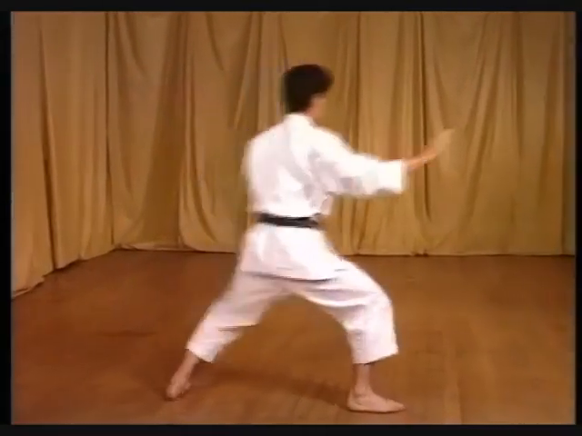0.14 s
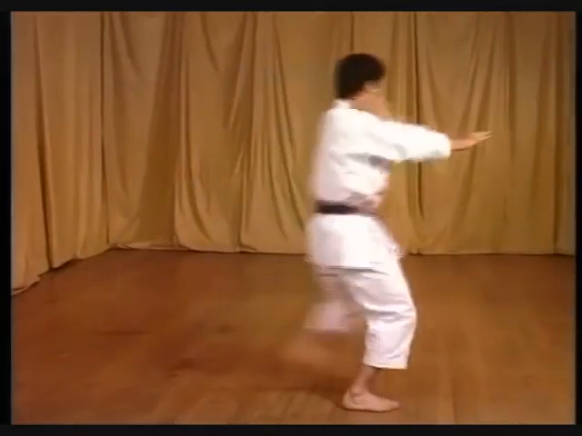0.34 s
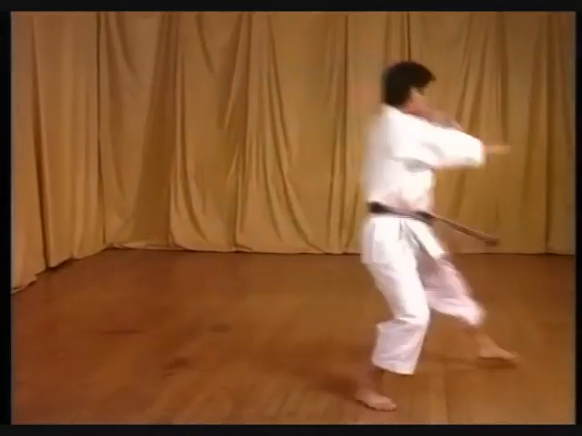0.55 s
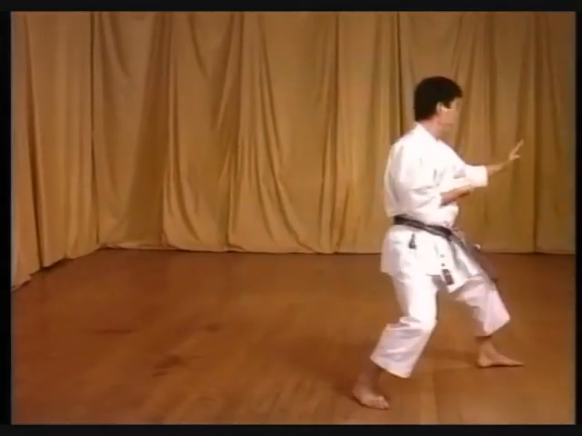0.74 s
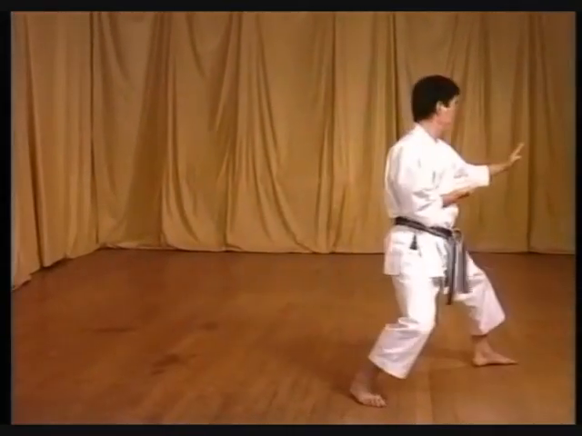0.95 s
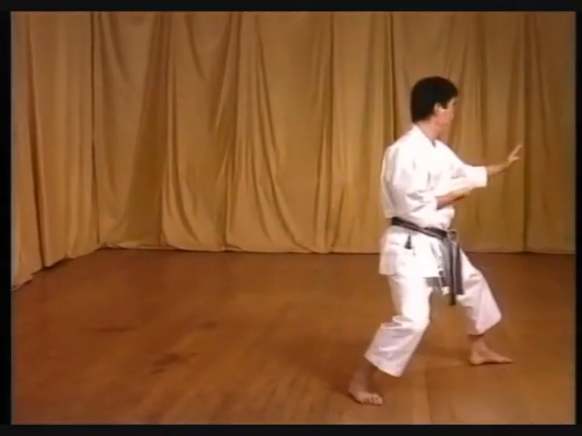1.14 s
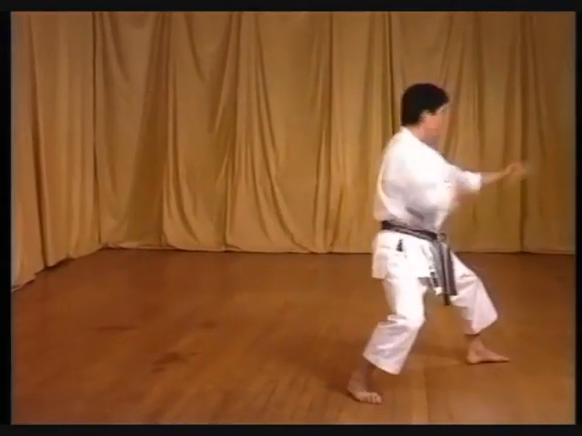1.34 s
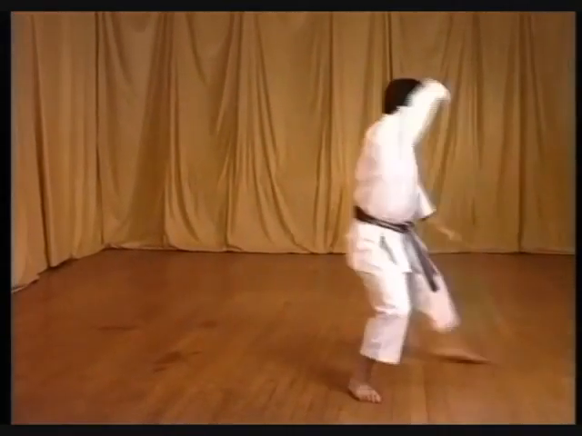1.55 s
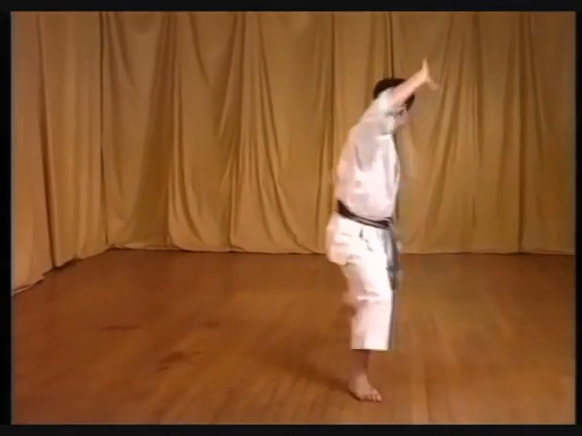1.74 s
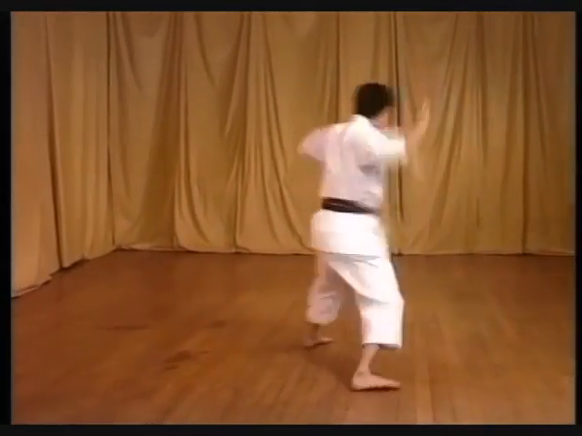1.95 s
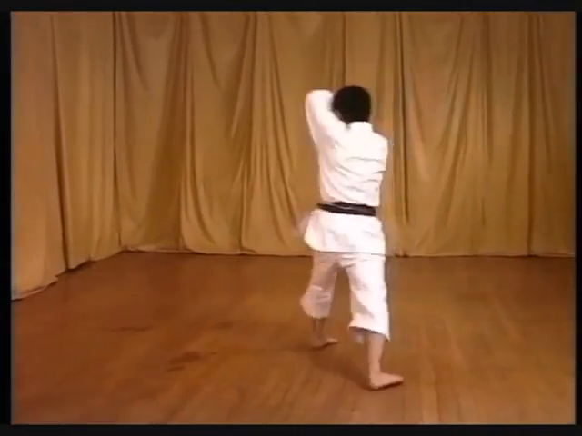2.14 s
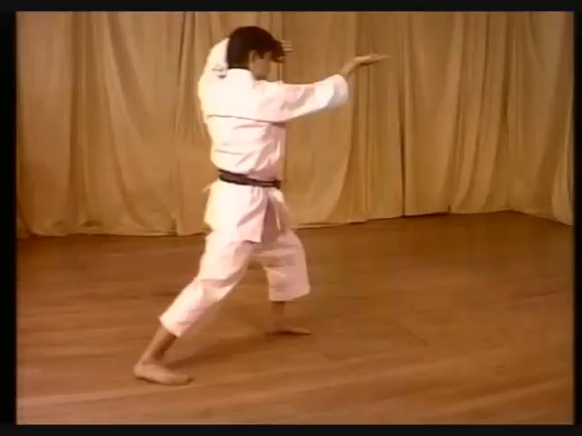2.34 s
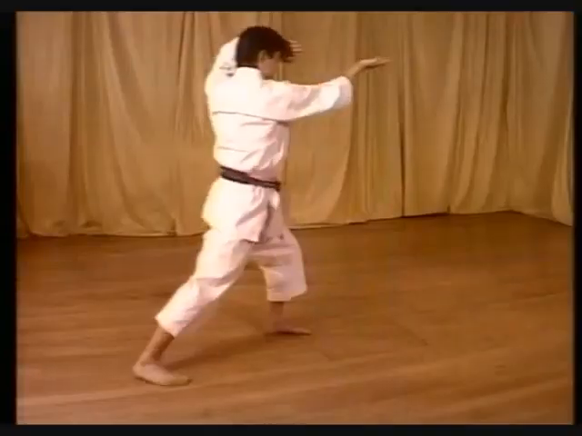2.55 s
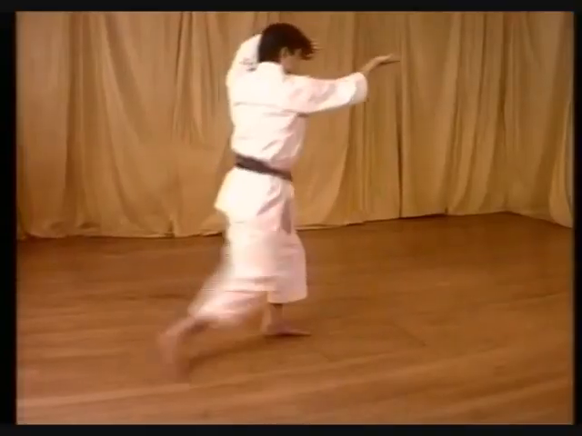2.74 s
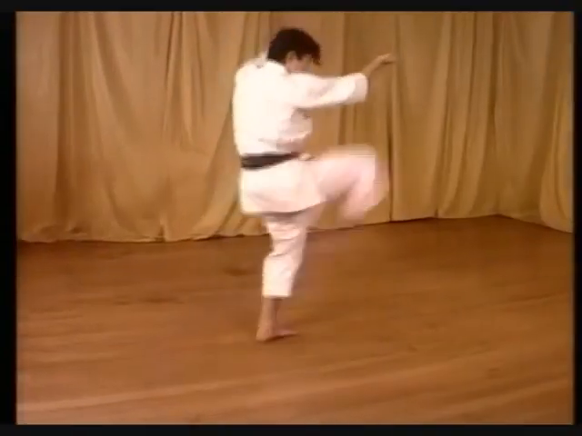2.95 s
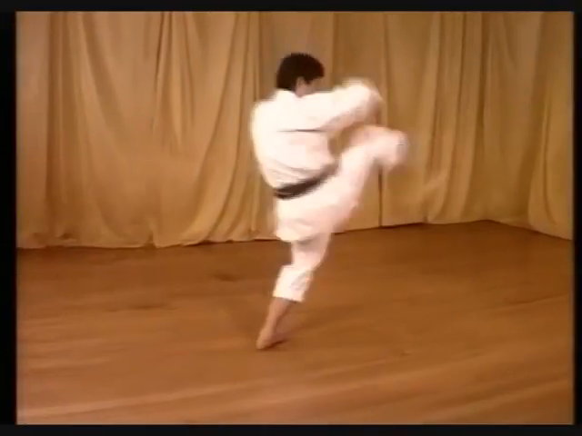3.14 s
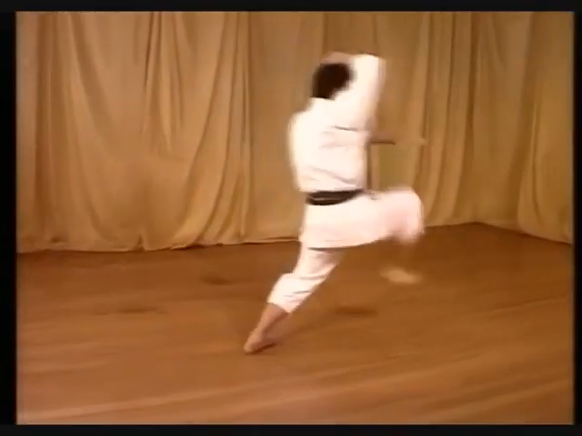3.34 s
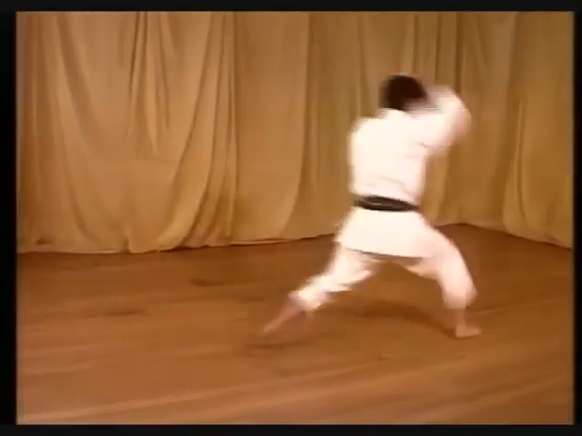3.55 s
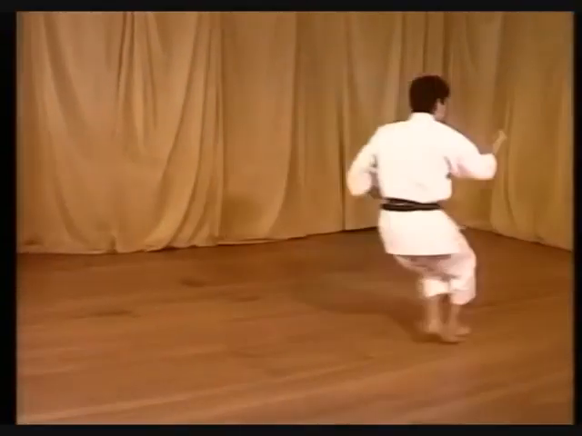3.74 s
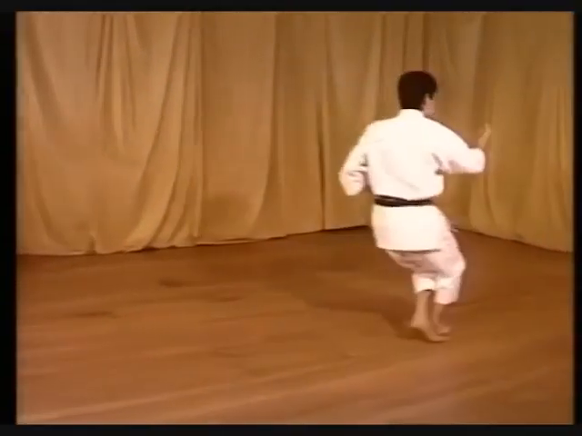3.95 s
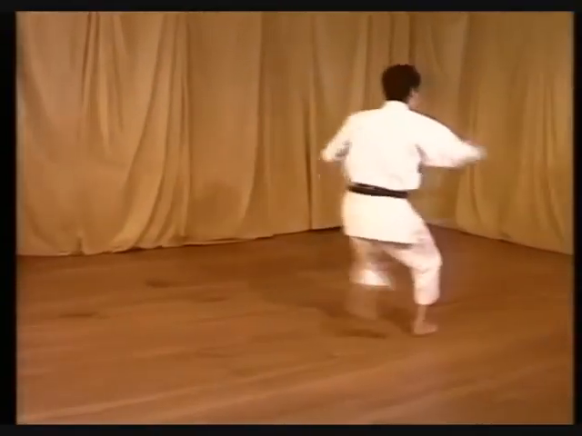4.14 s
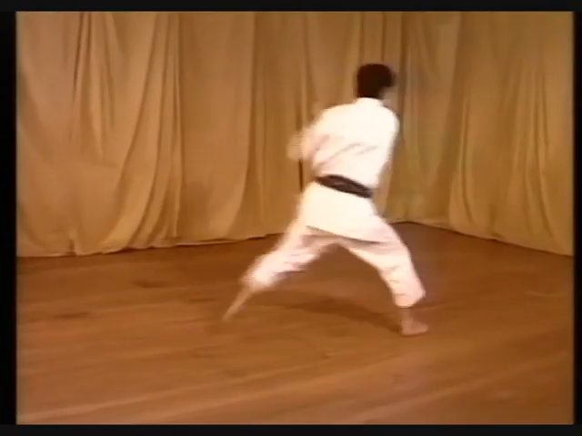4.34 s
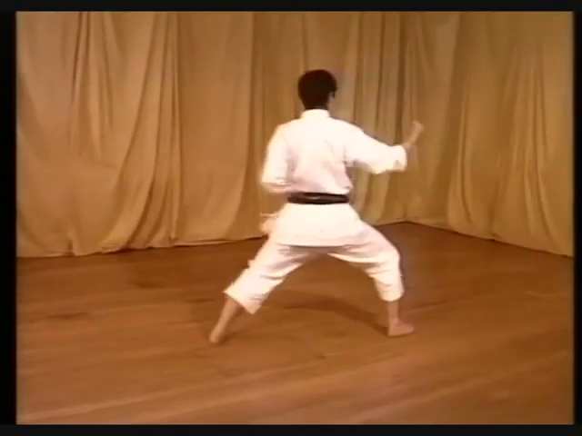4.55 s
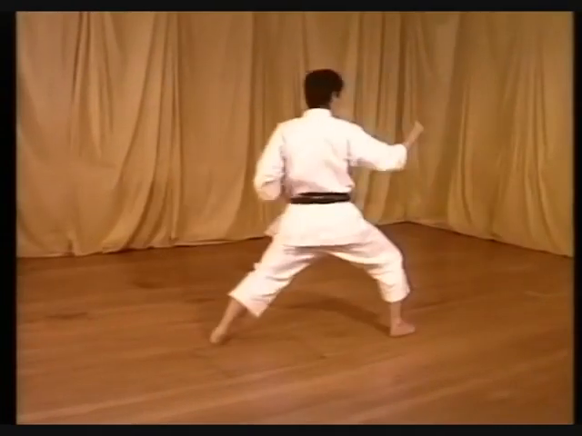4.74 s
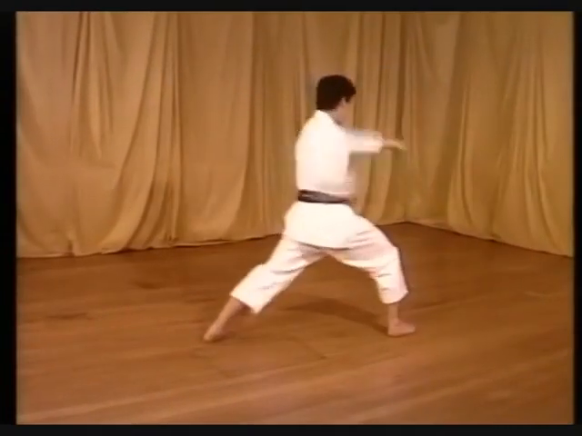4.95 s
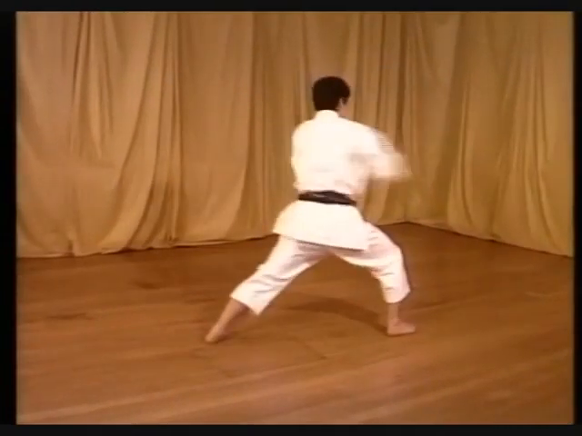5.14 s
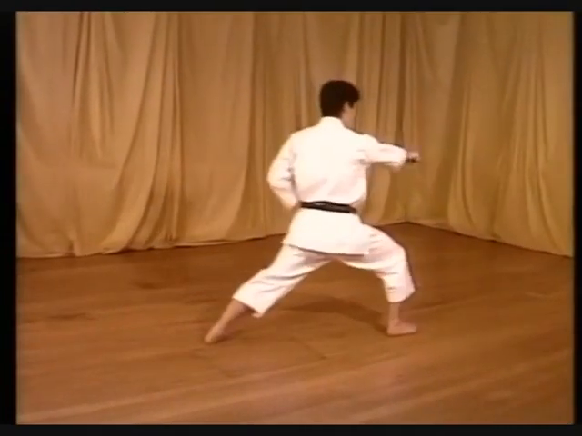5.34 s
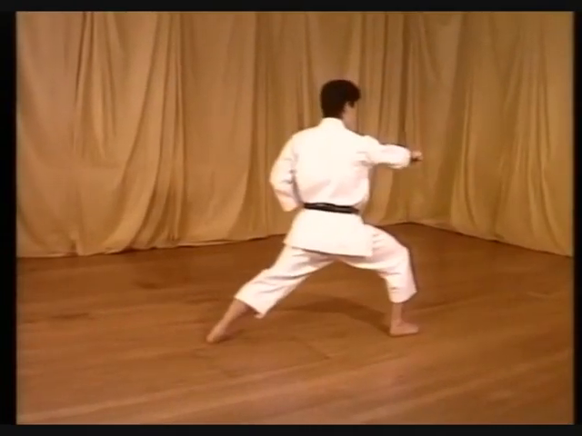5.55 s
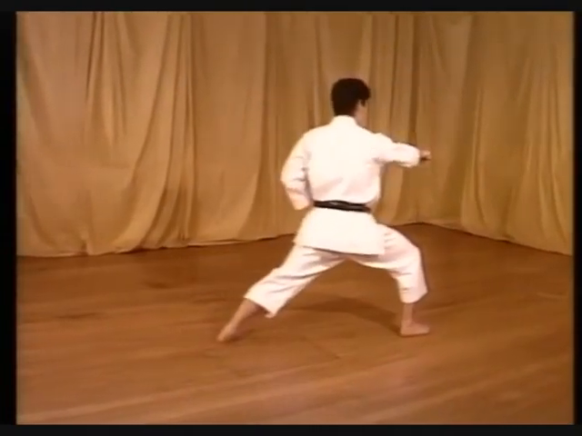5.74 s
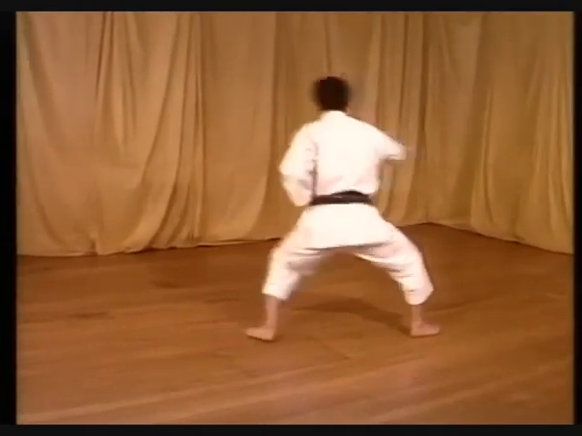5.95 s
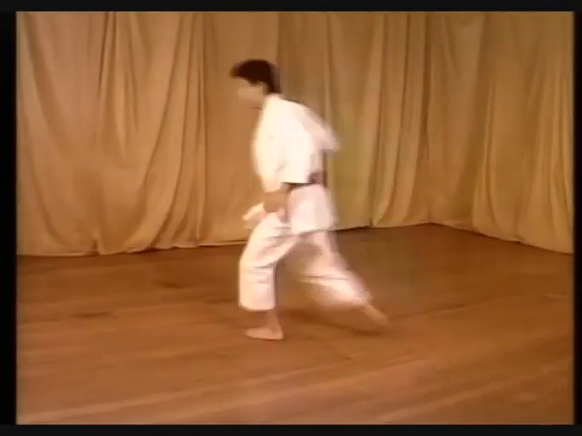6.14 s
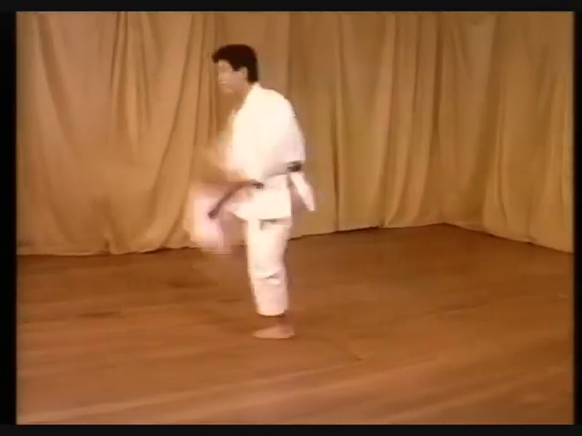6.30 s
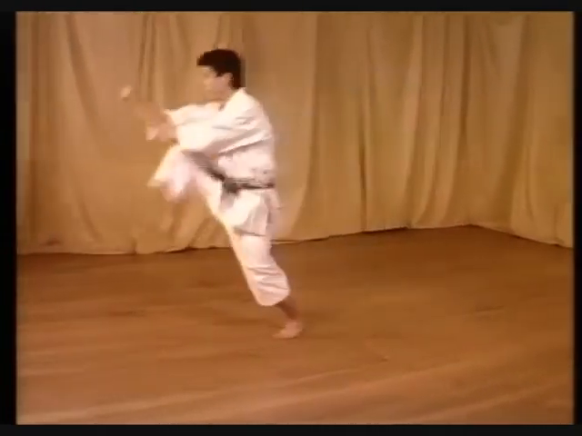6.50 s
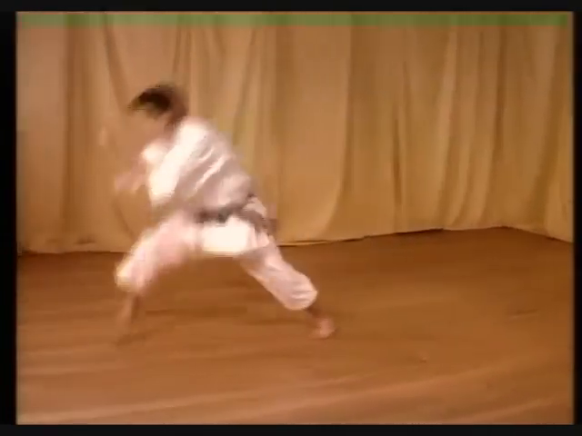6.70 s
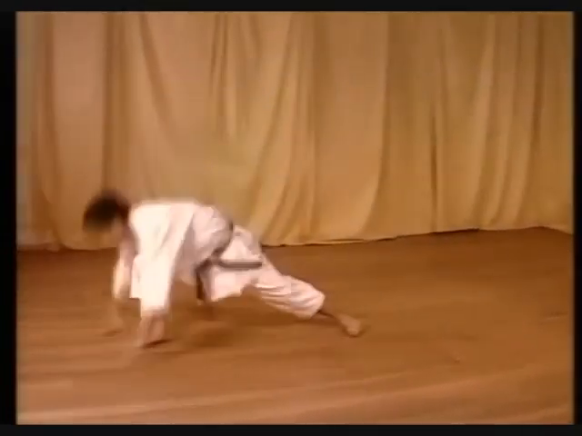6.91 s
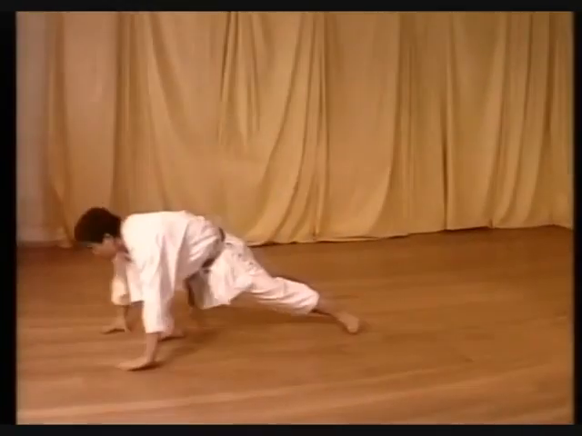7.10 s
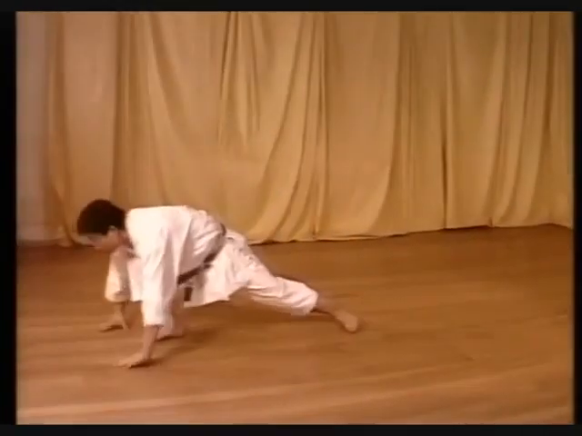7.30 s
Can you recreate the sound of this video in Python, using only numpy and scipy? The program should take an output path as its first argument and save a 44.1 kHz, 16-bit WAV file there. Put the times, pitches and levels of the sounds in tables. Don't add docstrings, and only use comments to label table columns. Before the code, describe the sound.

Low tape hiss and hum underlie bursts of thick cloth movement in an indoor hall. Early swishes and a crisp snap give way to a pause, turning rustles and soft foot squeaks. A jump lands with a huge, slightly squashed wooden thud, followed by a squeak, stamps and tight cloth pops. Near the end a sharp crack of cloth precedes a deep lunge thud and softer hand pats, all with short room reverberation.

```python
import sys
import numpy as np
from scipy import signal
from scipy.fft import rfft, irfft
from scipy.io import wavfile
from scipy.ndimage import uniform_filter1d

SR = 44100
rng = np.random.default_rng(int(sys.argv[2]) if len(sys.argv) > 2 else 0)


def decibels_to_gain(level_db):
    exponent = np.asarray(level_db, float) / 20
    return 10 ** exponent


def dump(signal):
    limited = np.clip(np.atleast_2d(signal).T, -1, 1)
    pcm = np.round(limited * 32767).astype(np.int16)
    wavfile.write(sys.argv[1], SR, pcm)


N = 329413


def unit(x):
    return x / np.sqrt(np.mean(x ** 2))


def band(x, low_hz, high_hz, order=2):
    edges_hz = [low_hz, min(high_hz, 0.48 * SR)]
    return signal.sosfilt(signal.butter(order, edges_hz, "band", fs=SR, output="sos"), x)


def walk(rate_hz):
    hold = int(SR / rate_hz)
    levels = rng.standard_normal(N // hold + 1)
    return uniform_filter1d(np.repeat(levels, hold), hold)[:N]


def bursts(starts_s, levels_db, lengths_ms, rise_ms):
    out = np.zeros(N + SR)
    t_ms = np.arange(SR // 4) / SR * 1000
    rise = np.minimum(t_ms / rise_ms, 1)
    for start_s, level_db, length_ms in zip(starts_s, levels_db, lengths_ms):
        i = int(start_s * SR)
        out[i:i + len(t_ms)] += decibels_to_gain(level_db) * rise * np.exp(-t_ms / max(length_ms, 0.3))
    return out[:N]


# frequency_hz [Hz], density_db [dB per Hz]
HISS_SPECTRUM = [(15, -38), (25, -2.5), (76, -7.5), (127, -6.5), (195, -19.5), (427, -10.5), (2410, -31),
                 (16000, -31)]
# [dB rms after, before the splice]
WHISTLES = [(100, -66, -74), (150, -72, -70), (9603, -78.5, -95), (15626, -80.5, -80.5)]
# time_s [s], level_db [dB rms]
MAINS_HUM = [(0.0, -58.5), (1.3, -72), (2.4, -66), (4.0, -58.5), (7.47, -54.5)]
HISS_DB, SPLICE_S = -58, 2.4


def machine_noise():
    hz, density_db = np.transpose(HISS_SPECTRUM)
    bin_hz = np.arange(N // 2 + 1) * SR / N + 1
    shape = decibels_to_gain(np.interp(np.log(bin_hz), np.log(hz), density_db))
    hiss = irfft(rfft(rng.standard_normal(N)) * shape, N)
    t = np.arange(N) / SR
    tape_time = t + np.cumsum(0.0004 * (walk(6) - walk(6))) / SR
    tones = np.zeros(N)
    for hz, late_db, early_db in WHISTLES:
        level_db = np.where(t > SPLICE_S, late_db, early_db) + 1.1 * walk(4.64)
        tones += decibels_to_gain(level_db) * np.sin(2 * np.pi * hz * tape_time)
    hum_db = np.interp(t, *np.transpose(MAINS_HUM)) + 1.7 * walk(6.8)
    tones += decibels_to_gain(hum_db) * np.sin(2 * np.pi * 50 * tape_time)
    return decibels_to_gain(HISS_DB + 0.12 * walk(1.8)) * unit(hiss) + np.sqrt(2) * tones


# centre_hz [Hz], t60_s [s], build_up_ms [ms], level_db [dB]
HALL_BANDS = [(59, 0.56, 150, 2), (124.5, 0.5, 4.4, -0.5), (225, 0.61, 2.5, -3.5), (431, 0.62, 1.4, -3),
              (1086, 0.55, 1.2, -7.5), (1820, 0.5, 0.46, -3.5), (3630, 0.42, 0.57, -7.5),
              (7850, 0.68, 7, -8.5), (13000, 0.48, 3, -13)]


def echoes(count):
    t = np.arange(int(1.3 * SR)) / SR
    echo = 0
    for hz, t60_s, build_up_ms, level_db in HALL_BANDS:
        noise = band(rng.standard_normal((count, len(t))), hz / np.sqrt(2), hz * np.sqrt(2))
        envelope = (1 - np.exp(-t * 1000 / build_up_ms)) * 1000.0 ** (-t / t60_s)
        echo = echo + decibels_to_gain(level_db) * noise * envelope
    return np.pad(echo, ((0, 0), (int(0.006 * SR), 0)))


def hall(x, echo):
    size = SR // 2
    out, padded = np.zeros(N + 4 * SR), np.pad(x, size)
    for k, i in enumerate(range(-size // 2, N, size // 2)):
        part = padded[i + size:i + 2 * size] * np.hanning(size)
        wet = signal.fftconvolve(part, echo[k % len(echo)])
        out[i + size:i + size + len(wet)] += wet
    return out[size:size + N]


# start_s [s], level_db [dB], pitch_hz [slips per s], length_s [s], overtone_db [dB]
SKIN_SQUEAKS = [
    (0.262, -14, 408, 0.023, -18.5),
    (1.946, -21.5, 402, 0.02, -40),
    (2.167, -25.5, 430, 0.045, -36),
    (2.265, -35.5, 520, 0.039, -43),
    (2.775, -33.5, 517, 0.037, -8.5),
    (2.799, -28.5, 576, 0.032, -26),
    (2.82, -32.5, 733, 0.027, -18),
    (4.088, -13.5, 318.6, 0.038, -13),
    (4.092, -21, 578, 0.045, -45),
]


def squeaks():
    out = np.zeros(N)
    waver = 1 + 0.015 * walk(150)
    for start_s, level_db, pitch_hz, length_s, overtone_db in SKIN_SQUEAKS:
        progress = np.arange(int(length_s * SR)) / (length_s * SR)
        i = int(start_s * SR)
        span = slice(i, i + len(progress))
        phase = 2 * np.pi * np.cumsum(pitch_hz * waver[span]) / SR
        tone = np.sin(phase) + decibels_to_gain(overtone_db) * np.sin(2 * phase)
        out[span] += decibels_to_gain(level_db) * np.sin(np.pi * progress) ** 2 * tone
    return out


def resonate(x, modes):
    out = 0
    for k, (hz, width_hz, level_db) in enumerate(modes):
        mode = signal.lfilter(*signal.iirpeak(hz, hz / width_hz, SR), x)
        out = out + (-1) ** k * decibels_to_gain(level_db) * mode
    return out


# start_s [s], blow_db [dB], boom_db, knock_db, slap_db [dB re blow]
FLOOR_BLOWS = [(0.666, -27, 14.5, -11, -20), (0.71, -24.5, -6, -1.5, 0), (1.951, -22, -9, -11.5, -33),
               (2.041, -38, -2, 14.5, 5), (3.645, 1.5, -4.5, -3.5, -11), (4.343, -29.5, -17, 9.5, 1),
               (4.537, -12, 1.5, 6.5, -24), (5.316, -14, -18, 6.5, -8), (6.172, -21, -1.5, -7, -13),
               (6.192, -31.5, -25, 7, -10), (6.846, -7.5, 9, -13, -11), (7.015, -20, 0.5, 7, -33),
               (7.04, -21, -23, -14, -29)]
# frequency_hz [Hz], width_hz [Hz], level_db [dB]
BOARD_MODES = [(139, 11, -33), (221.4, 115, -7), (269, 43, 3), (382.4, 99.4, 6.5), (430, 176, 3.5)]
# frequency_hz [Hz], width_hz [Hz], level_db [dB]
KNOCK_MODES = [(520, 227, 3.5), (641, 320, 6), (820, 180, -5.5), (946, 225, -4.5)]
SLAP_BAND = 1000, 2600
SCUFF_DB = -21.5
SCUFF_PER_DB, SCUFF_PER_BOOM = 0.8, 0.5


def stamps():
    start_s, blow_db, boom_db, knock_db, slap_db = np.transpose(FLOOR_BLOWS)
    count = len(start_s)
    lags_s = np.cumsum(rng.uniform(0.001444, 0.0046, (count, 3)), axis=1) - 0.0015

    def contacts(level_db):
        out = np.zeros(N)
        out[(start_s * SR).astype(int)] = decibels_to_gain(level_db)
        later = ((start_s[:, None] + lags_s) * SR).astype(int)
        out[later] = decibels_to_gain(level_db[:, None] - np.array([6, 9, 12]))
        return out

    blow = resonate(contacts(blow_db + 39), BOARD_MODES)
    blow += resonate(contacts(blow_db + knock_db + 32.5), KNOCK_MODES)
    blow = band(band(blow, 60, 1600), 30, 1800)
    boom = band(band(contacts(blow_db + boom_db + 42), 42, 144, order=1), 69, 206)
    slap = band(band(contacts(blow_db + slap_db + 18.5), *SLAP_BAND), 500, 4100)
    scuff_db = SCUFF_DB + SCUFF_PER_DB * blow_db + SCUFF_PER_BOOM * boom_db
    scuff_env = bursts(start_s, blow_db + scuff_db - 1.5, np.full(count, 9.0), rise_ms=1)
    scuff = band(rng.standard_normal(N) * scuff_env, 1530, 10400, order=1)
    return blow + slap + scuff, boom


# start_s [s], body_db [dB], length_ms [ms]
FOLD_POPS = [(0.211, -42, 5), (0.584, -32, 6.3), (2.125, -21, 3.8), (2.151, -23, 5.6), (2.341, -28, 3),
             (2.459, -37.5, 8), (2.779, -28, 3.4), (2.934, -29.5, 7.2), (3.07, -16, 1.86),
             (3.127, -23.5, 14), (3.165, -18, 12), (3.204, -40, 2.2), (4.445, -24, 5), (4.996, -21, 4.4),
             (5.058, -17, 9.8), (5.084, -9, 3.8), (5.284, -26, 11), (5.766, -35.5, 6), (6.328, -16.5, 4.8),
             (6.414, -17.5, 4), (6.485, -4, 1.06), (7.118, -26, 3.5), (7.232, -29, 4.2)]
# start_s [s], body_db [dB], slap_db,
# crack_db [dB re body], length_ms [ms]
BRIGHT_SNAPS = [(0.419, -36, -7, -24, 3.8), (0.651, -22.5, 2, 13.5, 6.5), (0.708, -29, 5, -5, 4.5),
                (0.732, -22, 0, -10, 3.6), (5.324, -24.5, 5, -15, 16.3), (1.128, -63.5, 20, 3, 2.1),
                (1.388, -49.5, 16.5, -10, 2.7), (1.545, -41, 9, -20, 4), (1.589, -17.5, -13, -35, 2.4),
                (1.942, -37.5, 8, -6, 2), (2.197, -36, 8, -25, 3.1), (2.276, -27.5, -7, -25, 5.1),
                (2.16, -43.5, 6, -27, 16), (2.855, -48, 1, 17, 11), (3.246, -45, 3, 21, 3.3),
                (3.845, -51, 9, 28, 10), (4.09, -35.5, -5, -20, 15), (4.365, -26, -4, -15, 9),
                (4.478, -30, -9, -22, 7.6), (4.535, -24, 7.5, 12.5, 7.6), (5.977, -37, -1, -15, 4.9),
                (6.241, -19, -10.5, -1, 2.7), (6.856, -1.5, -12, -26, 3)]
POP_SLAP_DB, POP_CRACK_DB = -26, -36


def snaps():
    pops = [(s, db, POP_SLAP_DB, POP_CRACK_DB, ms) for s, db, ms in FOLD_POPS]
    start_s, body_db, slap_db, crack_db, length_ms = np.transpose(list(BRIGHT_SNAPS) + pops)
    noise = rng.standard_normal((3, N))
    body_env = bursts(start_s, body_db + 13.5, 1.48 * length_ms, rise_ms=3)
    slap_env = bursts(start_s, body_db + slap_db + 4.5, 0.95 * length_ms, rise_ms=1)
    crack_env = bursts(start_s, body_db + crack_db - 20, 0.63 * length_ms, rise_ms=0.77)
    body = band(noise[0] * body_env, 290, 897)
    slap = band(noise[1] * slap_env, *SLAP_BAND)
    crack = band(noise[2] * crack_env, 3200, 18000, order=1)
    return body + slap + crack


# peak_s [s], flap_db [dB], build_up_s [s], die_away_s [s], brightness_db [dB]
LIMB_SWINGS = [(.235, -48, .1, .15, 3), (.46, -41, 0.8, 0.94, 6), (.6, -53.5, 0.3, 0.13, -6),
               (.728, -13, 0.18, 0.078, -1.5), (1.0, -41.5, 0.44, 0.25, -18), (1.49, -29, 0.15, 0.22, 4),
               (1.6, -28.5, 0.45, 0.48, 4), (2.07, -33.5, 0.24, 0.36, 2), (2.19, -27.5, 0.82, 0.17, -7),
               (2.282, -26.5, 0.12, 0.12, -9), (2.631, -37.5, 0.46, 0.99, -10.5),
               (2.85, -32.5, 0.15, 0.57, -4), (3.05, -36, 0.92, 0.24, 3.5), (3.178, -25.5, 0.54, 1, -3.5),
               (3.621, -38, 0.11, 0.3, 4.5), (4.469, -26.5, 0.53, 0.76, -2.5),
               (4.96, -26.5, 0.44, 0.57, -10), (5.08, -15.5, 0.2, 0.23, -4.5),
               (5.291, -24.5, 0.23, 0.3, -3.5), (6.05, -35, 0.59, 1, -3.5),
               (6.335, -23.5, 0.11, 0.39, -0.5), (6.43, -20.5, 0.25, 0.25, -24),
               (6.542, -21, 0.36, 0.24, 8.5), (7.45, -46, 0.4, 0.24, 4)]
# start_s [s], flap_db [dB], die_away_s [s], push_db [dB],
# brightness_db [dB]
CLOTH_JOLTS = [(.275, -34, 0.68, -21, -28), (.66, -31, 0.31, 15, -7), (1.955, -32, 0.23, 4, -9),
               (3.657, -11.5, 0.72, 8.5, -11), (4.094, -25, 0.32, 6, -16), (4.345, -22.5, 0.26, -10, -6),
               (4.54, -6.5, 0.26, -6.5, -19), (5.323, -12, 0.29, -15, -7), (5.765, -44, 0.23, -3, -14),
               (6.179, -20, 0.25, 4, -28), (6.66, -41.5, 1, -2.5, 6.5), (6.857, -19, 0.51, 15, 0.5),
               (7.013, -17.5, 0.43, -10, -39)]
FADE_DB, FADE_BEND, JOLT_RISE_S = 38.5, 0.92, 0.01
PUSH_DB, RUSTLE_DB, SWISH_DB = -1, -7.5, -20.5
RUSTLE_SHARE, PUSH_SHARE = 0.68, 0.45
RUSTLE_FADE, SWISH_FADE = 1.37, 1.16


def motion():
    moves = []
    for peak_s, flap_db, rise_s, fall_s, bright_db in LIMB_SWINGS:
        push_db = PUSH_DB - PUSH_SHARE * (flap_db + FADE_DB)
        moves.append((peak_s, flap_db, rise_s, fall_s, push_db, bright_db))
    for start_s, flap_db, fall_s, push_db, bright_db in CLOTH_JOLTS:
        moves.append((start_s + JOLT_RISE_S, flap_db, JOLT_RISE_S, fall_s, push_db, bright_db))
    t = np.arange(0, N / SR + 0.01, 0.001)
    fade = np.array([[1], [1], [RUSTLE_FADE], [SWISH_FADE]])
    power = 0
    for peak_s, flap_db, rise_s, fall_s, push_db, bright_db in moves:
        distance = np.where(t < peak_s, (peak_s - t) / rise_s, (t - peak_s) / fall_s)
        lost_db = FADE_DB * distance ** FADE_BEND
        layers_db = np.array([0, push_db, RUSTLE_DB + RUSTLE_SHARE * bright_db, SWISH_DB + bright_db])
        power = power + decibels_to_gain(flap_db + layers_db[:, None] - lost_db * fade) ** 2
    return np.array([np.interp(np.arange(N) / SR, t, gain) for gain in np.sqrt(power)])


def grains(rate_hz, spread_db):
    chance = rng.random((3, N))
    size_db = -spread_db * np.log(1 - 0.98 * chance[2])
    return unit((chance[0] < rate_hz / SR) * np.sign(chance[1] - 0.5) * decibels_to_gain(size_db))


def patchy(x, lowest_hz, tilt_db, patchy_db):
    out = 0
    for hz in lowest_hz * np.sqrt(2) ** np.arange(4):
        level_db = tilt_db * np.log2(hz) + patchy_db * walk(13)
        out = out + band(x, hz / 1.122, hz * 1.098) * decibels_to_gain(level_db)
    return unit(out)


def cloth():
    folds, creases = grains(300, 3.5), grains(1200, 2)
    flutter = decibels_to_gain(3.22 * walk(35))
    flap = unit(band(folds + 1.78 * creases, 315, 764))
    push = unit(band(folds + 3.03 * rng.standard_normal(N), 174, 466))
    rustle = patchy(creases + 1.8 * rng.standard_normal(N), 1150, tilt_db=-8.5, patchy_db=3.5)
    fibres = grains(4000, 0.67) + 0.35 * creases
    swish = patchy(fibres, 4700, tilt_db=-3, patchy_db=1.5)
    swish += 0.4 * unit(band(fibres, 4400, 5200))
    layers = [flutter * flap, flutter * push, flutter ** 0.25 * rustle, flutter ** 0.4 * swish]
    return decibels_to_gain(-9) * (motion() * layers).sum(axis=0)


def scene():
    skin = squeaks()
    feet, boom = stamps()
    pops = snaps()
    weave = cloth()
    sent = decibels_to_gain(-24) * feet + decibels_to_gain(-27) * boom
    sent += decibels_to_gain(-29) * pops + decibels_to_gain(-40) * weave + decibels_to_gain(-31) * skin
    return (feet + pops + weave + skin + hall(sent, echoes(count=7)))[None]


def band_limit(x):
    return signal.sosfilt(signal.butter(12, 16440, fs=SR, output="sos"), x)


def record(dry):
    tape_top = 0.33
    tape = dry / (1 + np.abs(dry / tape_top) ** 3) ** (1 / 3)
    playback = signal.butter(2, [45, 13000], "band", fs=SR, output="sos")
    played = signal.sosfilt(playback, tape) + machine_noise()
    top = signal.ellip(14, 0.3, 70, 15760, fs=SR, output="sos")
    mix = signal.sosfilt(top, played)
    return band_limit(mix)


dry = scene()
out = record(dry)
dump(out)
```